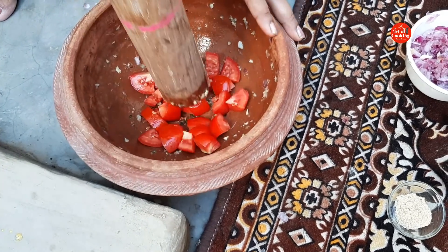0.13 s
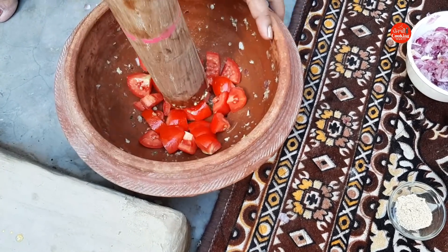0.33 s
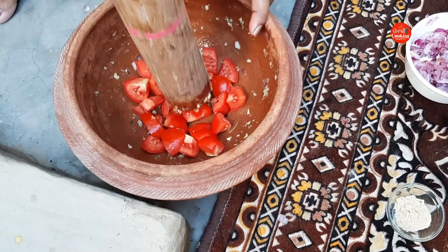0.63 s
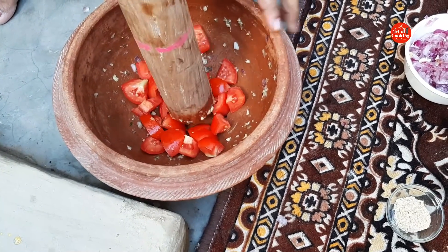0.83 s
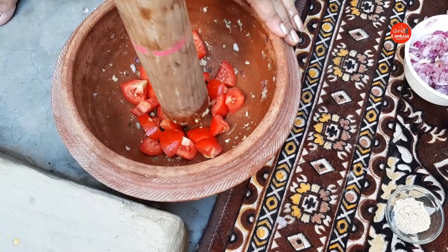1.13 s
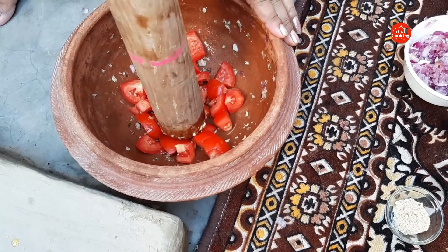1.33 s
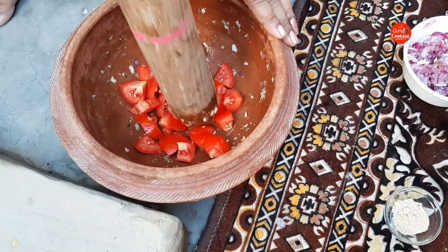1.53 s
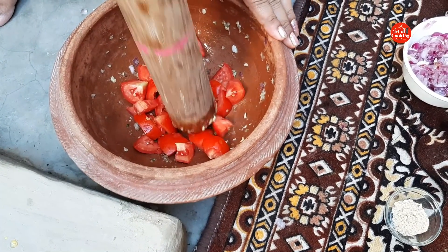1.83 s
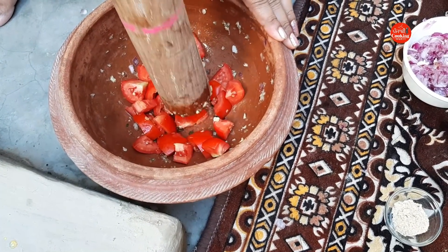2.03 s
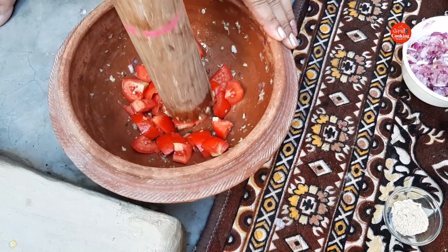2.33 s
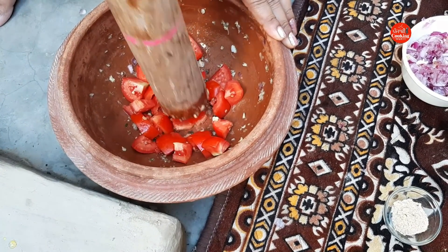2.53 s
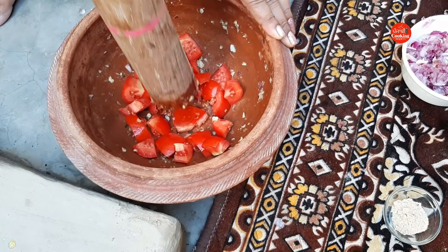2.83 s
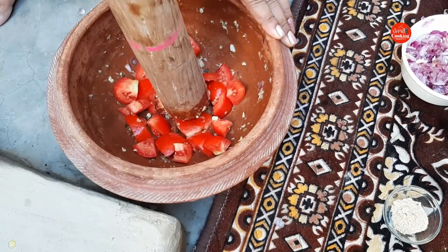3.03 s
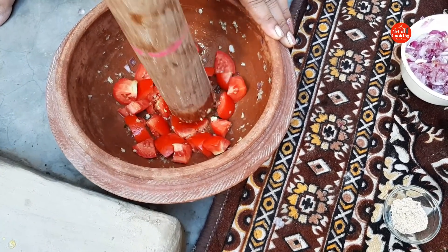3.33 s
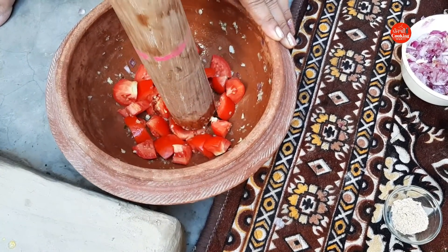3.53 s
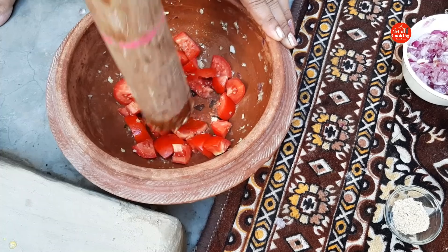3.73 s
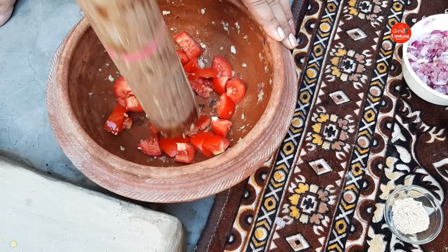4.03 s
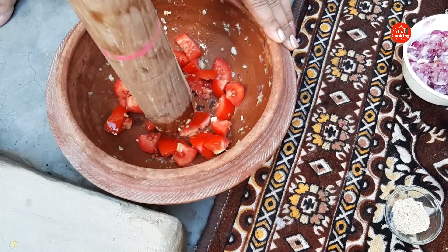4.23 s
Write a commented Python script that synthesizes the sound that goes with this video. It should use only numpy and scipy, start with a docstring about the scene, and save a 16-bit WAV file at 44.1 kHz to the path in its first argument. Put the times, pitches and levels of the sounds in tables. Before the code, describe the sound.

A long wooden pestle pounds tomato pieces in a clay mortar, close by, with the short echo of a small kitchen. A few faint taps open the first 0.3 seconds. After a pause, soft uneven thuds start around 0.9 seconds. From 1.4 seconds they settle into about three and a half strokes a second, growing stronger until 2.4 seconds. Each is a dull, hollow thud with a brief squirt of juice, and now and then a skin pops, most clearly at 1.6 seconds. After a softer stroke at 2.7 seconds and a short gap, two hard knocks on the clay at 3.3 and 3.6 seconds are the loudest sounds. Lighter strokes follow until about 4.3 seconds. Behind it all, a faint pan-like sizzle with tiny high chirps dies down after 3.3 seconds, and a very quiet low hum comes and goes.

```python
"""On a kitchen floor, a long wooden pestle pounds tomato pieces in a clay mortar, about 3.6 times a second.
Each stroke squirts juice, then thuds on the cushion of pulp; now and then a tomato skin bursts.
Two strokes break through, knock on the clay and jolt the bowl. The small room rings on.
Behind it something sizzles like a pan, with faint high chirps and a low hum that comes and goes."""
import sys
import numpy as np
from scipy import signal
from scipy.fft import rfft, irfft
from scipy.io import wavfile
from scipy.ndimage import uniform_filter1d

SR = 44100
rng = np.random.default_rng(int(sys.argv[2]) if len(sys.argv) > 2 else 0)


def generate_wav(signal):
    """Clip the signal to [-1, 1] and save it as 16-bit WAV at the path in sys.argv[1]."""
    frames = np.transpose(np.atleast_2d(signal))
    scaled = np.clip(frames, -1, 1) * 32767
    pcm = np.round(scaled).astype(np.int16)
    wavfile.write(sys.argv[1], SR, pcm)


N = 192978
TIME = np.arange(N) / SR

# pestle landings: t/s, hollow thud/dB, floor thump/dB, clay knock/dB, pulp cushion (0-1), juice/dB
PESTLE_BLOWS = [(0.021, -39, -30.5, -42, .2, -60), (0.108, -32.5, -31, -34, .15, -53),
                (0.204, -38, -38, -39, .6, -62), (0.273, -30, -30, -36, .3, -54),
                (0.9113, -24.5, -27.5, -32, .25, -60), (0.939, -34, -37, -38, .2, -58),
                (1.017, -37, -32, -41, .05, -56), (1.078, -25, -26.5, -34, .9, -25),
                (1.359, -37, -22, -31, .15, -37), (1.384, -26, -24, -26, .05, -37),
                (1.6252, -18.5, -25, -23, .9, -22), (1.9032, -15, -21, -14.5, .85, -22.5),
                (2.1742, -14.5, -18, -12.5, .87, -15), (2.208, -26, -41, -23, .05, -34),
                (2.4359, -10, -14.5, -11, .83, -20), (2.723, -24, -25, -32, .75, -18.5),
                (2.747, -38, -34, -27, .15, -43), (3.2766, -18, -17, 4.3, .82, -22.5),
                (3.559, -19, -19.5, 3.3, .9, -26), (3.8751, -24, -32, -23.5, .55, -58),
                (4.121, -21.5, -27, -19.5, .62, -32), (4.161, -24.5, -31, -26.5, .05, -41),
                (4.303, -38.5, -35, -43, .3, -60)]
# the bowl dropping back, with levels counted from the knock that lifted it:
# delay/s, thud/dB, thump/dB, knock/dB, pulp cushion (0-1), juice/dB
BOWL_REBOUND = (.0099, -16, -25.5, -17, .33, -23)
# tones of the hollow around the pestle: f/Hz, level/dB, ring time/s (the time to fade by 60 dB)
HOLLOW_MODES = [(394.8, 0.5, 0.032), (580, -4.5, 0.043)]
# tones of the full mortar bouncing on the floor: f/Hz, level/dB, ring time/s
FLOOR_MODES = [(176, 3.5, 0.032), (257.7, -2.5, 0.057)]
# tones of the clay wall, damped by pulp: f/Hz, level/dB, ring time/s
CLAY_MODES = [(663, 3.5, 0.02), (806, -20.5, 0.015), (1060, -8.5, 0.015), (1140, -13.5, 0.017),
              (1420, -36, 0.034), (2270, -13, 0.049), (2440, -12.5, 0.03), (3150, -20, .02)]
# tomato skins bursting, with a splash of spray just after the 2.44 s stroke and a small squelch of settling
# pulp: t/s, level/dB, f/Hz
LONE_SQUELCHES = [(0.8093, -26, 4680), (1.345, -31.5, 6300), (1.6273, -13, 6100), (2.451, -35.5, 11000),
                  (2.710, -24, 2900), (2.885, -42, 2000), (3.013, -36.5, 4300), (4.111, -32, 7500)]
# the echo of the walls, band by band: f/Hz, level/dB, ring time/s
ECHO_BANDS = [(60, -8, .6), (125, -8, 0.49), (200, 3, 0.51), (390, -4.5, 0.36), (540, -5, 0.38),
              (740, -10, 0.42), (1500, -4, 0.28), (3000, -4.5, 0.32), (5950, -7.5, 0.24),
              (14000, -13, 0.32)]
# standing waves, the notes the kitchen holds: f/Hz, level/dB, ring time/s
STANDING_WAVES = [(187.2, -52, 0.48), (237.7, -59, 0.63), (312.6, -62, 0.68), (409.3, -59, 0.29),
                  (490, -53, 0.2), (541, -49, 0.12), (637, -76, 0.36), (765, -62, 0.24), (794, -53, 0.22),
                  (865, -50.5, 0.23)]
# the sizzle dying down: t/s, level/dB
SIZZLE_LEVELS = [(0, -42.3), (.3, -41), (1.3, -42), (2.3, -45), (3.25, -45), (3.8, -56), (4.38, -56.8)]
# tone colour of the sizzle: f/Hz, level/dB
SIZZLE_COLOUR = [(500, -8.5), (1500, -13), (2400, -9), (3200, -5), (4200, 3.5), (5300, -1.5), (7500, -1),
                 (9500, -10), (12500, -10), (16000, -14.5)]
# tone colour of the low room noise: f/Hz, level/dB
AIR_COLOUR = [(20, -16), (50, -2.5), (90, 6), (130, 7.5), (180, 0), (300, -3.5), (600, -7.5), (1200, -14),
              (3000, -63)]
# spells of low hum: start/s, end/s, f/Hz, level/dB
HUM_SPELLS = [(-.2, 1.42, 56.5, -52), (1.55, 2.6, 87, -53), (2.55, 4.2, 54.5, -60)]

# what pulp under the pestle changes: (with none, with a full cushion)
CONTACT_MS, DETUNE_SEMITONES = (.15, 1.0), (2.6, .5)
JUICE_HZ, SPRAY_DB = (2100, 3500), (-29, 5.5)
JUICE_SWELL_MS, JUICE_FADE_MS = (2.8, 1.0), (9, 3.3)


def pestle(knock_pan_db=1.5, lag_ms=0.13):
    """Each landing pushes the bowl and rings it; pulp makes the push longer, the sound duller and lower."""
    t = np.arange(SR // 4) / SR
    floor_ring = ring(FLOOR_MODES, t)
    out = np.zeros((2, N))
    for s, thud_db, thump_db, knock_db, pulp, _ in landings():
        contact_age = t[:SR // 100] * 1000 / between(CONTACT_MS, pulp)
        push = contact_age * np.exp(-5 * contact_age)
        shift = 2 ** (between(DETUNE_SEMITONES, pulp) / 12)
        thump = undb(thump_db) * floor_ring
        thud = undb(thud_db) * ring(HOLLOW_MODES, t, shift)
        knock = undb(knock_db) * ring(CLAY_MODES, t, shift) * pan(knock_pan_db)
        add(out, -signal.fftconvolve(thump + thud + knock, push[None] / push.sum(), axes=1), s)
    # the sound reaches the right side slightly later
    return np.array([out[0], np.interp(TIME - lag_ms / 1000, TIME, out[1])])


def landings(jolt_db=-6):
    """Every blow, and after the hardest knocks the bowl dropping back on the floor."""
    delay_s, thud, thump, clay, pulp, juice = BOWL_REBOUND
    for blow in PESTLE_BLOWS:
        yield blow
        s, _, _, knock_db, _, _ = blow
        if knock_db > jolt_db:
            yield s + delay_s, knock_db + thud, knock_db + thump, knock_db + clay, pulp, knock_db + juice


def tomatoes(juice_pan_db=.4, burst_pan_db=1.8):
    """Every landing squeezes out juice, brighter and shorter on more pulp; now and then a skin bursts, juice
    splashes or the pulp settles."""
    out = np.zeros((2, N))
    for s, *_, pulp, juice_db in landings():
        wet = squirt(between(JUICE_HZ, pulp), between(JUICE_SWELL_MS, pulp),
                     between(JUICE_FADE_MS, pulp), between(SPRAY_DB, pulp))
        add(out, undb(juice_db) * pan(juice_pan_db) * wet, s - wet.shape[-1] / 2 / SR)
    for s, db, pitch_hz in LONE_SQUELCHES:
        wet = squirt(pitch_hz, swell_ms=1.3, fade_ms=2.4, spray_db=-10)
        add(out, undb(db) * pan(burst_pan_db) * wet, s - wet.shape[-1] / 2 / SR)
    return out


def squirt(pitch_hz, swell_ms, fade_ms, spray_db, sharpness=1.57, spray_power=1.57):
    """Juice shoots through a gap: a quick swell of tiny pops and fine spray, loudest at its middle."""
    size = 4096
    ms = (np.arange(size) - size // 2) * 1000 / SR
    hz = bins(ms)
    flow = np.exp(np.where(ms < 0, -(ms / swell_ms) ** 2 / 2, -ms / fade_ms))
    # the pocket of air under the pestle gives the squirt its pitch
    off_pitch = hz / pitch_hz - pitch_hz / hz
    pocket = 1 / (1 + 1j * sharpness * off_pitch) / (1 + (off_pitch / 3) ** 2)
    mist = 1 / (1 + (3500 / hz) ** 4) / (1 + (hz / 14000) ** 2)  # lets 3500-14000 Hz through
    layers = []
    for tone in (pocket, mist):
        bubbles = pops((3, size), per_s=6000, spread_db=-2.0)
        layers.append(stereo(unit(irfft(rfft(bubbles) * tone)), split_hz=1800))
    gush, spray = layers
    # spray flies only while the pressure is highest
    return gush * flow + undb(spray_db) * spray * flow ** spray_power


def pops(shape, per_s, spread_db):
    """Tiny bursting bubbles: scattered clicks of random size."""
    sizes = undb(spread_db * np.minimum(rng.standard_exponential(shape), 5))
    popping = rng.random(shape) < per_s / SR
    return unit(popping * rng.choice([-1, 1], shape) * sizes)


def kitchen_echo(dry, gap_ms=4.0, build_ms=0.67, lead_ms=0.098):
    """Nearby walls return a dense echo, longest in the bass, and hold a few standing waves."""
    t = np.arange(SR * 3 // 4) / SR
    hz, db, ring_s = np.transpose(ECHO_BANDS)
    spectrum = rfft(stereo(rng.standard_normal((3, len(t))), split_hz=450))
    onset = 1 - np.exp(-np.maximum(1000 * t - gap_ms, 0) / build_ms)
    echo = 0
    for share, band_db, band_ring_s in zip(np.eye(len(hz)), db, ring_s):
        band = irfft(spectrum * np.interp(np.log(bins(t)), np.log(hz), share), len(t))
        fade = onset * undb(-60 * t / band_ring_s)
        echo = echo + undb(band_db) * band * fade / np.linalg.norm(fade)
    # standing waves reach the left side a moment sooner
    stereo_t = t + np.array([[lead_ms], [0]]) / 1000
    echo = echo + onset * ring(STANDING_WAVES, stereo_t)
    return signal.fftconvolve(dry, echo, axes=1)[:, :N]


def sizzle_and_air(rustle_db=.9, chirp_db=-50.5, flutter_db=2.5, air_db=-53, pan_db=3.3):
    """Countless small bubbles sizzle; high chirps and low room noise sink with them, but less far."""
    sizzle_db = np.interp(TIME, *np.transpose(SIZZLE_LEVELS))
    sunk_db = sizzle_db - sizzle_db.max()
    bubbles = stereo(pops((3, N), per_s=5000, spread_db=2.5), split_hz=1200)
    sizzle = unit(colour(bubbles, SIZZLE_COLOUR))
    noise = stereo(rng.standard_normal((3, N)), split_hz=300)
    air = unit(colour(noise, AIR_COLOUR)) * undb(air_db + .33 * sunk_db)
    chirping = chirps() * undb(chirp_db + .45 * sunk_db + flutter_db * wander(per_s=20))
    rustling = sizzle * undb(sizzle_db + rustle_db * wander(per_s=20))
    return (rustling + chirping) * pan(pan_db) + air


def chirps(per_s=320, low_hz=3750, high_hz=5100, width_ms=4.9, glide=.07, spread_db=9):
    """Tiny peeps, each sliding a little in pitch, flutter on top of the sizzle."""
    out = np.zeros((2, N))
    t = np.arange(-SR // 40, SR // 40) / SR
    for when, pitch, length, slide, size, side in rng.random((int(per_s * N / SR), 6)):
        width_s = width_ms / 1000 * 4 ** (length - 1)
        stereo_t = t + np.array([[0], [side - .5]]) / high_hz
        hz = low_hz + pitch * (high_hz - low_hz)
        cycles = hz * (stereo_t + glide * (slide - .5) * stereo_t ** 2 / width_s)
        peep = np.exp(-(t / width_s) ** 2) * np.sin(2 * np.pi * cycles)
        add(out, undb(spread_db * size ** 3) * peep, when * N / SR)
    return unit(out)


def hum(fade_s=.2, waver_hz=1.0):
    """A deep, slightly wavering hum that fades in and out."""
    out = 0
    drift_hz = waver_hz * wander(per_s=2)
    side_phase = np.array([[-.15], [.15]])
    for start, end, hz, db in HUM_SPELLS:
        fade = np.clip(np.minimum(TIME - start, end - TIME) / fade_s, 0, 1)
        phase = 2 * np.pi * np.cumsum(hz + drift_hz) / SR
        out = out + undb(db) * fade * unit(np.sin(phase + side_phase))
    return out


def ring(modes, t, shift=1):
    """Add up fading tones; neighbours in the list swing in opposite directions."""
    return sum((-1) ** k * undb(db - 60 * t / ring_s) * np.cos(2 * np.pi * shift * hz * t)
               for k, (hz, db, ring_s) in enumerate(modes))


def stereo(three, split_hz):
    """Turn three unrelated sounds into left and right: the bass is shared, the treble differs."""
    own_share = 1 / (1 + (split_hz / bins(three)) ** 2)
    spectra = rfft(three)
    return irfft(np.sqrt(1 - own_share) * spectra[0] + np.sqrt(own_share) * spectra[1:], three.shape[-1])


def colour(x, points):
    """Shape the bass and treble along a curve of f/Hz, level/dB points."""
    hz, db = np.transpose(points)
    gain = undb(np.interp(np.log(bins(x)), np.log(hz), db))
    return irfft(rfft(x) * gain, x.shape[-1])


def wander(per_s):
    """A smooth random curve with a typical size of 1."""
    hold = int(SR / per_s)
    steps = np.repeat(rng.standard_normal(N // hold + 1), hold)
    return unit(uniform_filter1d(steps, hold)[:N])


def between(ends, share):
    """Slide from the first value to the second as share goes from 0 to 1."""
    return ends[0] + (ends[1] - ends[0]) * np.clip(share, 0, 1)


def add(track, sound, s):
    """Mix a sound in at s seconds."""
    start = max(int(s * SR), 0)
    track[..., start:start + sound.shape[-1]] += sound[..., :N - start]


def pan(db):
    """Left and right gains, with the left louder by db."""
    return undb(np.array([[db], [-db]]) / 2)


def bins(x):
    """The frequencies in the spectrum of x, at least 1 Hz."""
    return np.maximum(np.fft.rfftfreq(x.shape[-1], 1 / SR), 1)


def undb(db):
    """Turn decibels into a number to multiply by."""
    return 10 ** (np.asarray(db) / 20)


def unit(x):
    """Scale to an average strength (rms) of 1."""
    return x / np.sqrt(np.mean(x ** 2))


def scene(bowl_hz=145, juice_echo_db=-3.5):
    """The mortar close by, its echo, and the kitchen behind."""
    # a small bowl gives off little deep bass
    bass_cut = signal.butter(4, bowl_hz, "high", fs=SR, output="sos")
    knocks = signal.sosfilt(bass_cut, pestle())
    juice = signal.sosfilt(bass_cut, tomatoes())
    # the bowl sends the wet sounds straight up, so less of them reaches the walls
    echo = kitchen_echo(knocks + undb(juice_echo_db) * juice)
    return knocks + juice + echo + sizzle_and_air() + hum()


def record(dry, top_hz=16000):
    """Round off the hardest knocks and cut the highest treble."""
    rounded = dry / (1 + dry ** 6) ** (1 / 6)
    return signal.sosfilt(signal.ellip(8, .2, 70, top_hz, fs=SR, output="sos"), rounded)


dry = scene()
out = record(dry)
generate_wav(out)
```